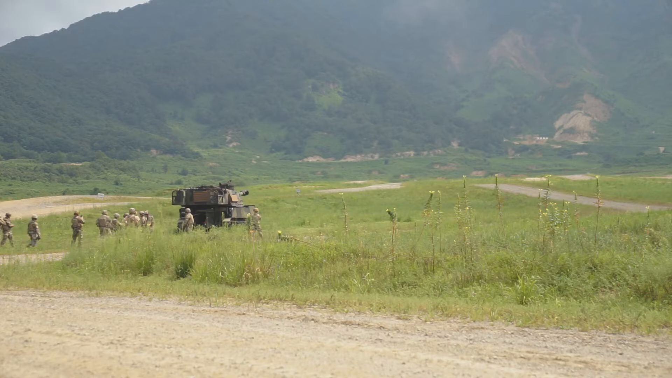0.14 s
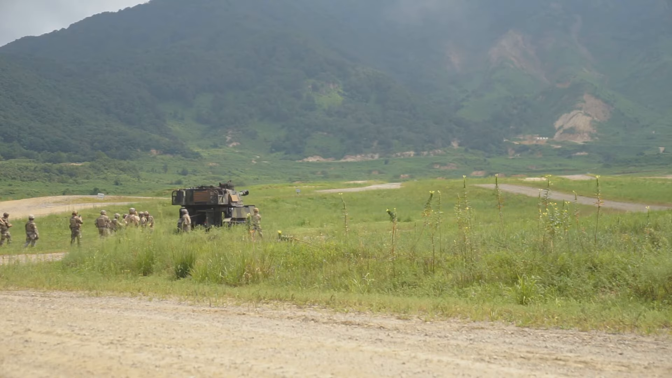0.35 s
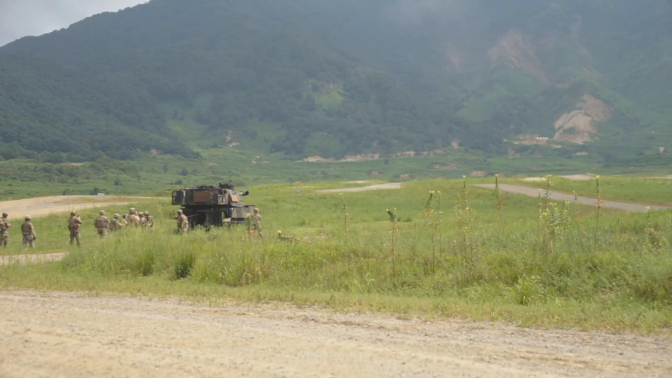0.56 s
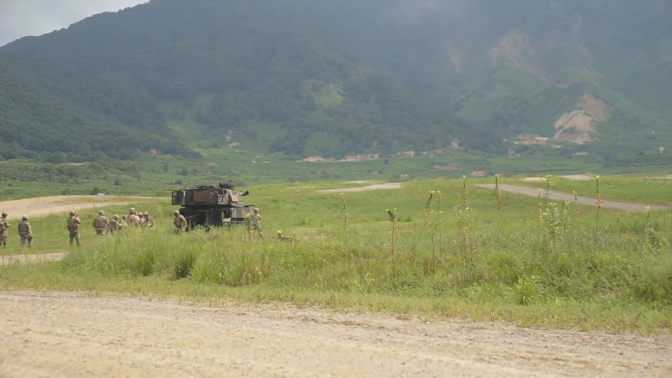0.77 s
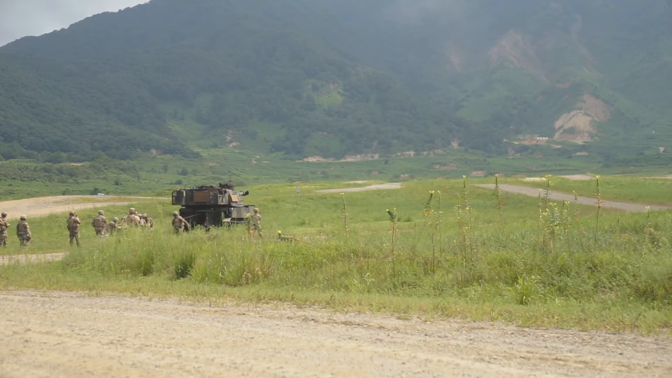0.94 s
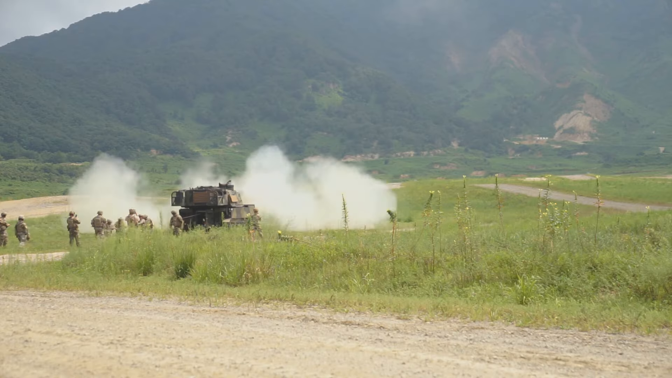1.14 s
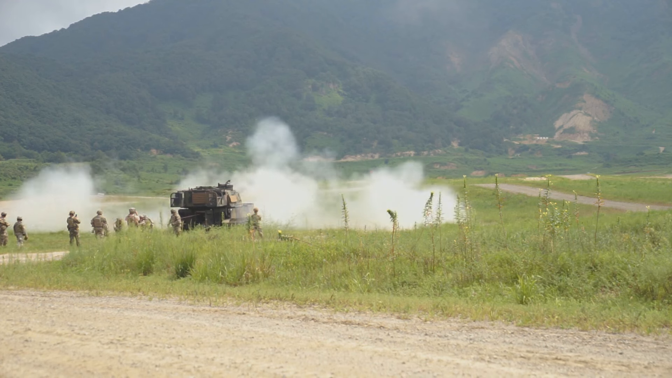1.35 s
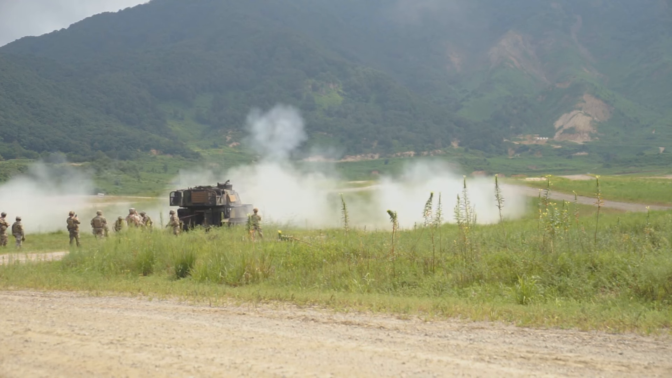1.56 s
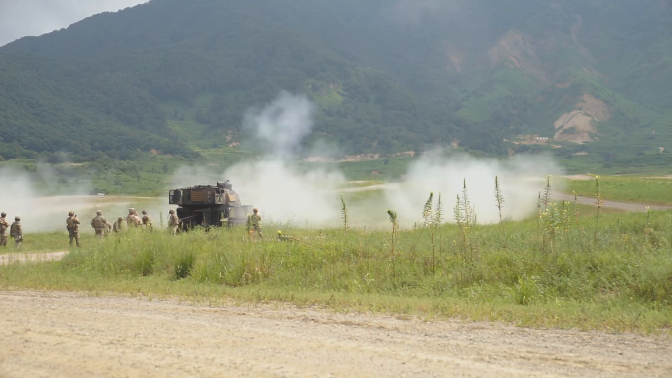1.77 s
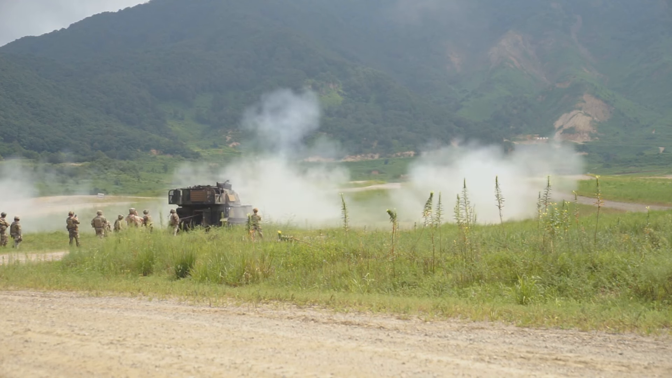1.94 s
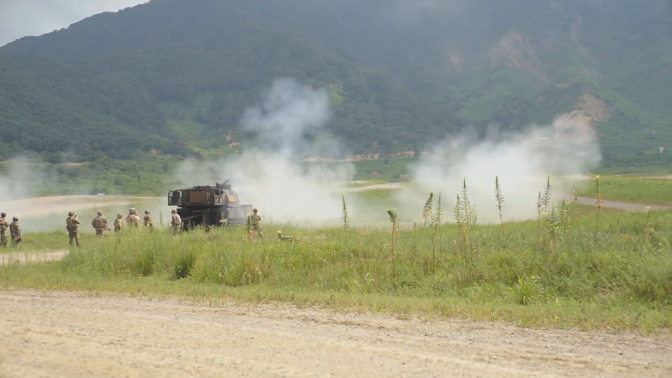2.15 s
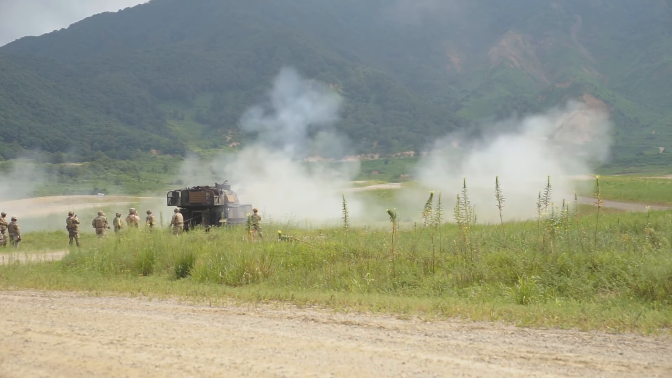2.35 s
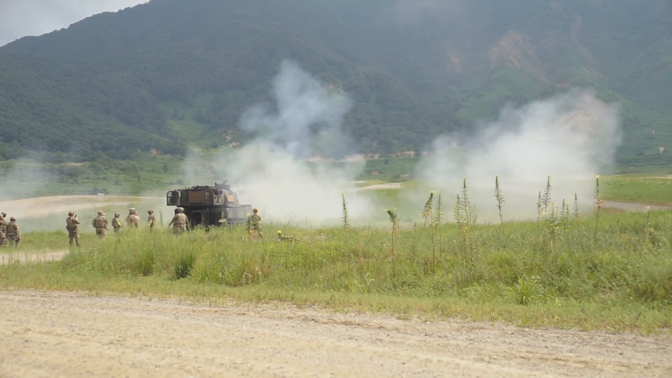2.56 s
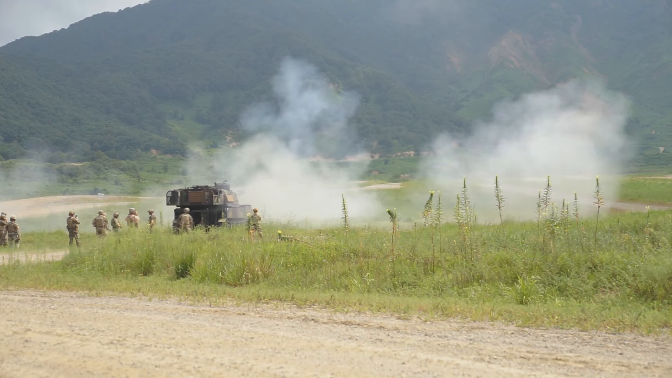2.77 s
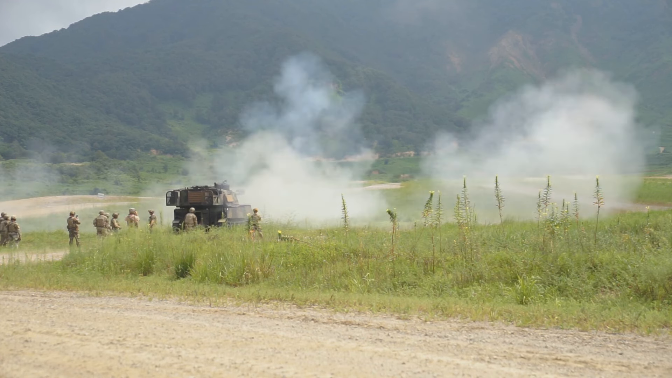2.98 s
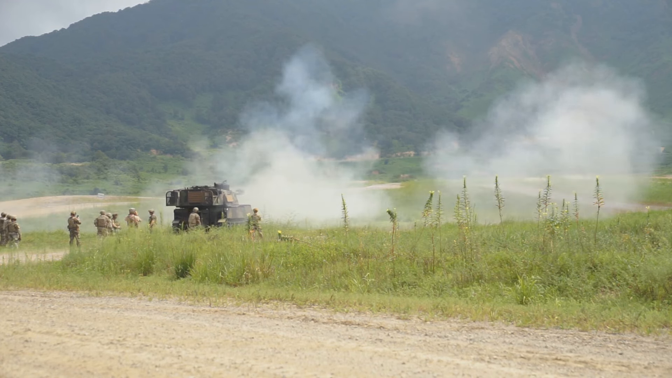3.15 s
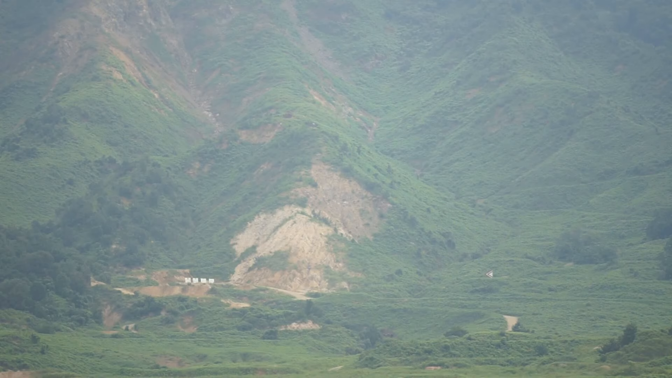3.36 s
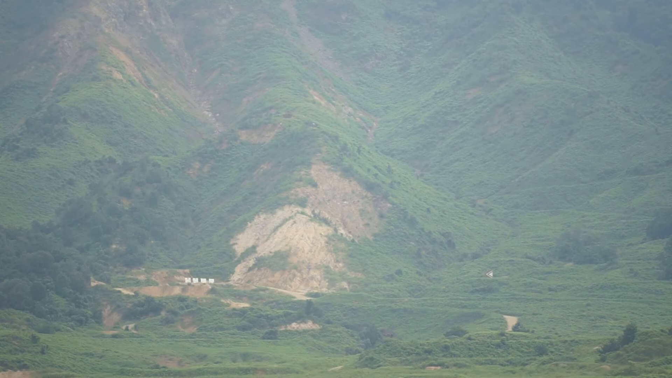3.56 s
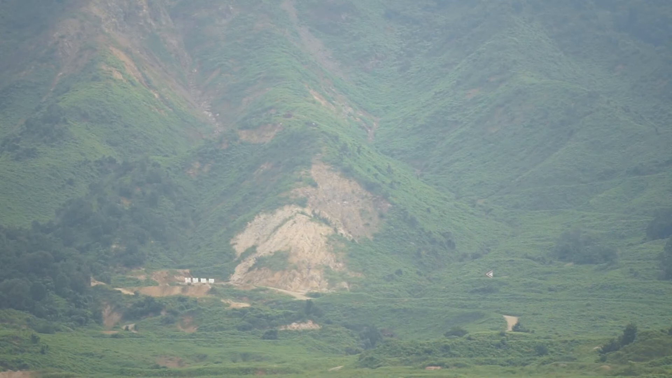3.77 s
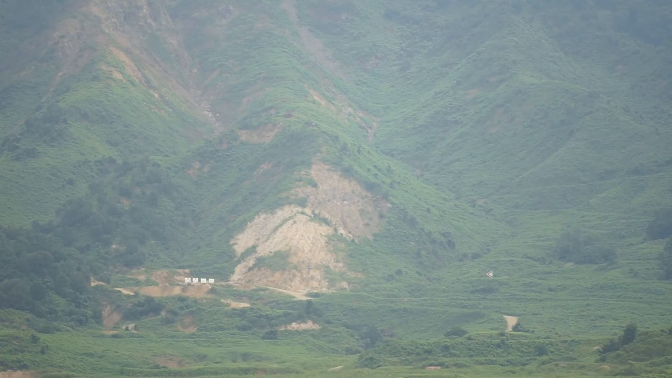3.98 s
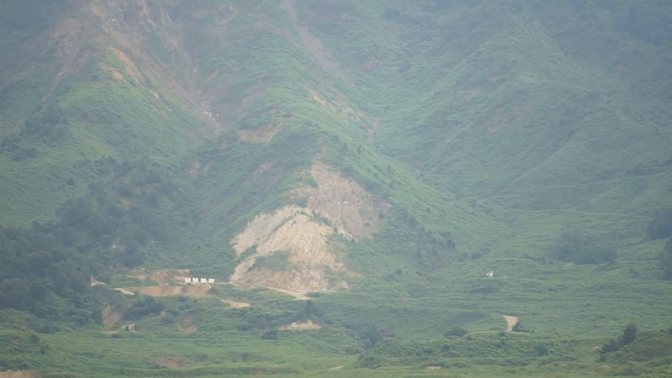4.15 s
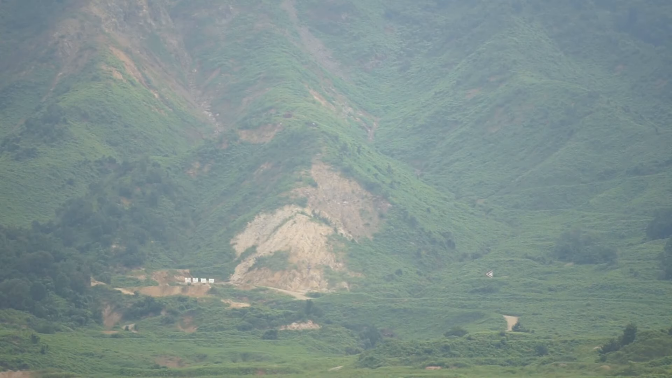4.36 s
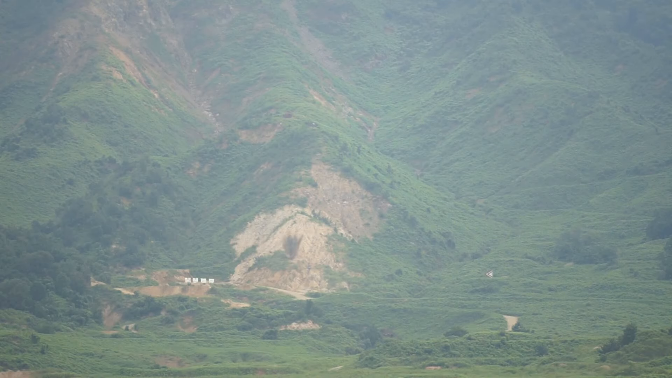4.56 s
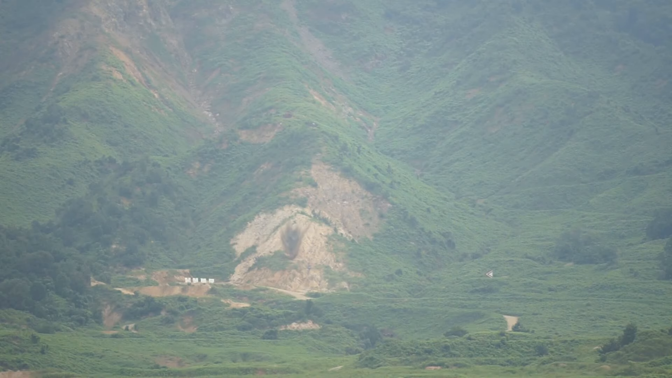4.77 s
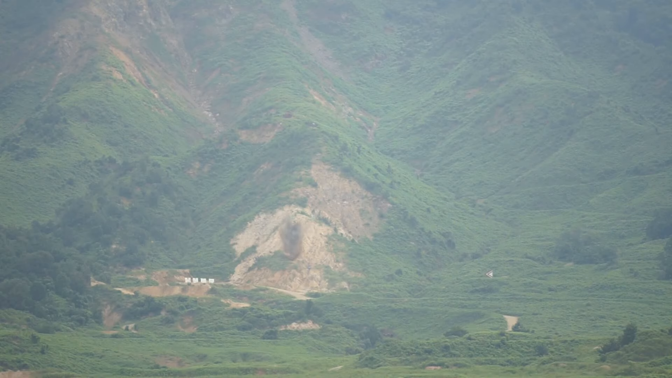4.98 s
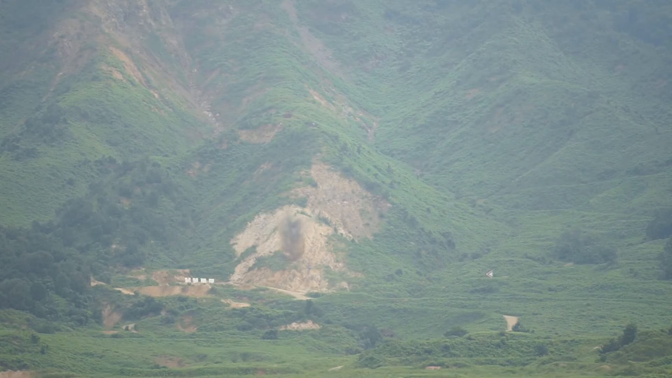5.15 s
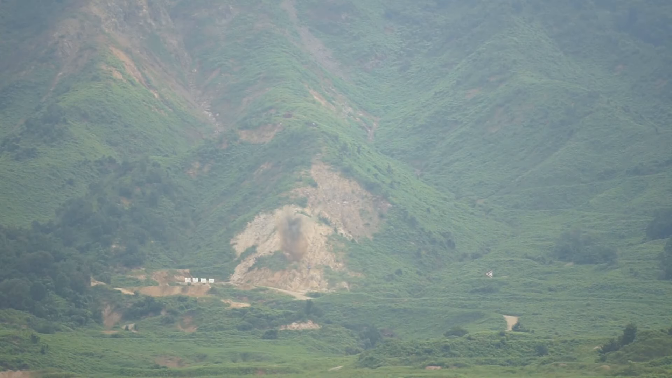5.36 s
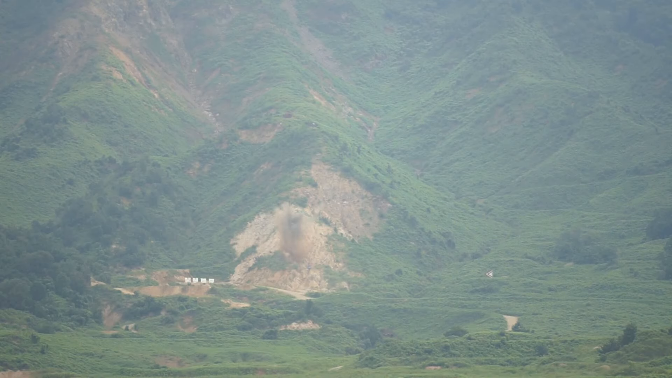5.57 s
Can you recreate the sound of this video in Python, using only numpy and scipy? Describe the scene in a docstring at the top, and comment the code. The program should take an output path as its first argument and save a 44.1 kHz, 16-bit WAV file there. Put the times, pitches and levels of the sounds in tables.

```python
"""A gun blast on an open range: muzzle shocks with turbulent bursts and a deep whump overload a microphone.
Single slopes return hard echoes, built as delayed, lengthened pressure fronts. Grass and ground scatter
the blast as coloured noise, and wooded hills answer with a long roll that dulls as it fades.
Beneath lie the gun's idling engine, sines on one drifting shaft over a noise rush, and faint bird whistles."""
import sys
import numpy as np
from scipy import signal
from scipy.fft import rfft, irfft, next_fast_len
from scipy.io import wavfile
from scipy.ndimage import uniform_filter1d, map_coordinates

SR = 44100
rng = np.random.default_rng(int(sys.argv[2]) if len(sys.argv) > 2 else 0)


def digitize_waveform(pressure):
    """Quantize a signal to 16-bit integers and store it at the path in sys.argv[1].

    Rows of a 2-D input are taken as channels; values are limited to [-1, 1].
    """
    field = np.atleast_2d(pressure).T
    bounded = np.clip(field, -1, 1)
    quanta = np.round(bounded * 32767).astype(np.int16)
    wavfile.write(sys.argv[1], SR, quanta)


N = 247833
T = np.arange(N) / SR  # time in s

# All levels stand ahead of the microphone's overload; colours give relative level only.
# Fronts of the blast: start_s, peak_db, push_s, turbulence_db
MUZZLE_FRONTS = [(1.351, 28, 0.00051, -6), (1.357, 10, 0.00063, 12.5), (1.3604, 17, 0.0093, -3),
                 (1.3676, 8, 0.00048, 4), (1.3734, 4, 0.0034, 16), (1.3851, 16.5, .0024, 0.5),
                 (1.4004, 4, .0013, -11), (1.412, -3, 0.0022, -12)]
# Spectrum of the turbulence: frequency_hz, level_db
TURBULENCE_SPECTRUM = [(100, -2.5), (290, 2), (500, -10), (700, 6), (900, 1.5), (1400, -0.5), (2400, -12),
                       (3600, -8), (6000, -19), (15000, -35.5)]
# Oscillation of the muzzle gas: centre_s, half_length_s, pitch_hz, level_db
GAS_BALL = (1.467, .02, 75, 0)
# Hard echoes, levels ahead of air absorption: start_s, crack_db, thud_db
HARD_ECHOES = [(1.6391, 3, -18), (1.6411, 1, -3), (1.6418, 13, 7.5), (1.98, 4, -8), (1.984, -1, -6),
               (1.989, 1.5, -13), (2.0255, 1, -14), (2.0482, -4, -30), (2.158, -5, -5),
               (2.8051, -12.5, -17)]
# Broad slopes, each returning one swell, levels ahead of each layer's gain: start_s, low_roll_db, scatter_db
BROAD_SLOPES = [(1.706, -20, -23.5), (1.96, -20.5, -37.5), (2.18, -23, -36), (2.32, -32.5, -27.5),
                (2.85, -43, -37.5)]
# Spectrum of the low roll: frequency_hz, level_db
BOOM_SPECTRUM = [(12, -4), (25, -1.5), (45, 3.5), (68, 1), (110, -2), (160, -4), (240, -13), (350, -34.5),
                 (800, -70.5)]
# Spectrum scattered by grass and ground: frequency_hz, level_db
FIELD_SPECTRUM = [(150, -21), (250, 5.5), (359, -7), (392, 0), (516, -12.5), (945, -7), (1120, -11),
                  (1290, -12), (1700, -11), (1920, -14.5), (3110, -12), (5790, -18.5), (8920, -26.5),
                  (12400, -32.5), (15500, -41)]
# Spectrum scattered by the wooded hills: frequency_hz, level_db
HILL_SPECTRUM = [(150, -14), (250, -7.5), (352, -3), (404, -3), (531, -4.5), (664, -1.5), (1820, -8.5),
                 (3500, -10.5), (4840, -18), (5750, -20), (6710, -26), (7820, -29.5), (9280, -34),
                 (13800, -45.5), (15000, -66.5)]
# Firing orders and gear whine: frequency_hz, rms_level_db
ENGINE_LINES = [(75.4, -66), (96.9, -45.5), (172.3, -54), (592.2, -71), (672.9, -58.5), (845.2, -61.5),
                (888.2, -72.5), (952.8, -75), (985.1, -65), (1082, -62), (1270, -68.5), (1588, -71.5),
                (1685, -62.5), (3370, -72.5), (4043, -80)]
# Spectrum of the fans' rush: frequency_hz, level_db
RUSH_SPECTRUM = [(12, -57.5), (20, -10.5), (92, -2.5), (178, -5), (398, -20.5), (571, -18), (674, -20),
                 (733, -16.5), (1080, -20), (1510, -25), (1680, -26), (1830, -27), (3460, -34.5),
                 (12400, -67), (15000, -84)]
# Bird whistles: centre_s, length_s, pitch_hz, glide_hz, level_db
BIRD_WHISTLES = [(0.167, 0.17, 3200, -63, -71), (.19, .16, 2640, -62, -66), (4.762, 0.042, 4060, 65, -69),
                 (5.355, 0.06, 3640, 400, -63)]
# Ripples of the microphone's housing: frequency_hz, level_db
HOUSING_RIPPLES = [(2600, 0), (3600, 2), (4800, -1.5), (5800, 3.5), (6900, -1), (8000, 3), (9200, -3.5),
                   (11000, 0.5)]
# Channel imbalance: frequency_hz, left_minus_right_db
CHANNEL_LEAN = [(100, 1.5), (1000, 1.46), (3500, 0.25), (8000, 0)]

SUCTION_S = .008  # divided by the push length it gives the suction's gain: the sharper, the deeper
TURBULENCE_T60_S, TURBULENCE_SPREAD = 0.016, 2.1  # at the first front; seconds more per second of detour
# An echo's crack after one second of detour, and the time constant of every thud
CRACK_S, CRACK_RISE_S, CRACK_SUCTION, THUD_S = .0005, 0.000204, 1.4, .0016
ECHO_TOP_HZ = 5060  # the air takes the treble above this
SLOPE_RISE, SLOPE_FALL = 0.73, 0.77  # seconds per 60 dB for each second of detour
GRASS_UNTIL_S = 1.8  # slopes that answer sooner are grassy, later ones wooded
NEAR_S, NEAR_RISE_S = 1.4025, .05  # the ground around the gun answers
HILLS_S, HILLS_RISE_S, HILLS_HOLD_S = 1.974, 0.21, 0.26  # the hills answer, from their foot to their crest
TOP_HZ = 15150  # upper band edge of the output


def blast():
    """Shock waves: muzzle fronts and first bounces each trail turbulence; later bursts last longer."""
    waves, bursts = np.zeros(N), np.zeros(N)
    for start, peak_db, push, turbulence_db in MUZZLE_FRONTS:
        waves += amp(peak_db) * front(start, push, SUCTION_S / push, rise=.00003)
        t60 = TURBULENCE_T60_S + TURBULENCE_SPREAD * detour(start)
        bursts += (T > start) * amp(turbulence_db - 60 * np.abs(T - start) / t60)
    return waves + bursts * scatter(TURBULENCE_SPECTRUM, rate=1200, distinct_db=-3.5)


def whump():
    """Gas oscillation: the ball of muzzle gas collapses and swings back for a few deep cycles."""
    centre, half_length, hz, db = GAS_BALL
    envelope = np.exp(-((T - centre) / half_length) ** 2)
    return amp(db) * envelope * -np.cos(2 * np.pi * hz * (T - centre))


def echoes():
    """Specular reflection: single faces return a crack that lengthens with distance, then a thud of suction."""
    sound = np.zeros(N)
    for start, crack_db, thud_db in HARD_ECHOES:
        stretch = np.sqrt(detour(start))
        crack = front(start, stretch * CRACK_S, CRACK_SUCTION, stretch * CRACK_RISE_S)
        u = np.clip((T - start - 2 * stretch * CRACK_S) / THUD_S, 0, 60)
        thud = -u * (2 - u) * np.exp(-u)  # suction first, then a rebound
        sound += amp(crack_db) * crack + amp(thud_db) * thud
    return filtered(sound, lambda hz: 1 / (1 + 1j * hz / ECHO_TOP_HZ))


def boom(gain_db=3):
    """Superposition: the suction phases of many reflections merge into an unbroken low roll."""
    roll = coloured(rng.standard_normal(N), BOOM_SPECTRUM)
    local_power = np.abs(uniform_filter1d(roll ** 2, size=2200))
    roll /= np.sqrt(local_power + 1e-6)  # evens out the noise's own swells
    near = swell(NEAR_S, db=-7, rise=NEAR_RISE_S, hold=0, t60=0.69)
    far = swell(HILLS_S, db=-31, rise=1.8, hold=HILLS_HOLD_S, t60=4.27)
    slopes = [slope(start, roll_db) for start, roll_db, _ in BROAD_SLOPES]
    return amp(gain_db) * together([near, far] + slopes) * roll


def field():
    """Diffuse scattering: grass and ground hiss back the shock's treble, a quick fall, then a faint tail."""
    near = swell(NEAR_S, db=-13, rise=NEAR_RISE_S, hold=.03, t60=0.46)
    tail = swell(NEAR_S, db=-26.5, rise=NEAR_RISE_S, hold=0, t60=2.96)
    grassy = [slope(start, db) for start, _, db in BROAD_SLOPES if start < GRASS_UNTIL_S]
    return together([near, tail] + grassy) * scatter(FIELD_SPECTRUM, rate=2100, distinct_db=-4)


def hills(gain_db=0.54, dulling_db=3.0, pivot_hz=900, midway_s=1.89, limit_hz=4000, patchy_db=1.64, surge_db=0.47):
    """Absorption along the path: echoes through more air and forest tilt darker, then hold that tilt."""
    hz, t, spectrum = signal.stft(scatter(HILL_SPECTRUM, rate=270, distinct_db=-13.5), SR, nperseg=512)
    octaves = np.log2(np.clip(hz, 250, limit_hz) / pivot_hz)[:, None]
    tilt_db = -dulling_db * octaves * np.clip(t - midway_s, -.4, 1.2)  # dulling_db is per octave per second
    patches = uniform_filter1d(rng.standard_normal(spectrum.shape), size=5, axis=0)  # across frequency
    patches = unit(uniform_filter1d(patches, size=10, axis=1))  # across time
    roll = signal.istft(spectrum * amp(tilt_db + patchy_db * patches), nperseg=512)[1][:N]
    surges_db = surge_db * wobble(45)  # ridge after ridge answers
    forest = swell(HILLS_S, db=-28.0, rise=HILLS_RISE_S, hold=HILLS_HOLD_S, t60=4.58)
    wooded = [slope(start, db) for start, _, db in BROAD_SLOPES if start >= GRASS_UNTIL_S]
    return amp(gain_db + surges_db) * together([forest] + wooded) * roll


def engine(drift=0.00103, flutter_db=1.34, rush_db=-45.5):
    """Rotating machinery: the idling diesel's orders and gear whine share one shaft, over the rush of its fans."""
    turns = T + drift * np.cumsum(wobble(2.6)) / SR  # shaft time, drifting slightly
    lines = np.zeros(N)
    for hz, db in ENGINE_LINES:
        tone = np.sqrt(2) * np.sin(2 * np.pi * (hz * turns + rng.random()))
        lines += amp(db + flutter_db * wobble(4.8)) * tone
    rush = coloured(rng.standard_normal(N), RUSH_SPECTRUM)
    return lines + amp(rush_db + .5 * wobble(4)) * rush


def birds():
    """Frequency glide: short whistles, blurred in level on their way across the field."""
    song = np.zeros(N)
    for centre, length, hz, glide, db in BIRD_WHISTLES:
        u = np.clip((T - centre) / length, -.5, .5)
        envelope = np.cos(np.pi * u) ** 2
        phase = 2 * np.pi * np.cumsum(hz + glide * u) / SR
        song += amp(db) * envelope * np.sqrt(2) * np.sin(phase)
    return song * wobble(180)


def front(start, push, suction, rise):
    """Blast wave: a jump in pressure that falls through zero into a longer suction."""
    t = np.maximum(T - start, 0)
    u = np.minimum(t / push, 60)
    wave = (1 - u) * np.exp(-u) * (1 - np.exp(-t / rise))
    return np.where(wave < 0, suction * wave, wave)


def scatter(colour, rate, distinct_db):
    """Diffuse reflection: countless tiny returns, with rate stronger ones a second standing out."""
    distinct = rng.standard_normal(N) * (rng.random(N) < rate / SR)
    return coloured(rng.standard_normal(N) + amp(distinct_db) * unit(distinct), colour)


def slope(start, db):
    """Spread of path lengths: the farther a slope, the more its swell is drawn out."""
    return swell(start, db, SLOPE_RISE * detour(start), 0, SLOPE_FALL * detour(start))


def swell(start, db, rise, hold, t60):
    """Exponential growth and decay: climbs 60 dB in rise seconds up to start, holds, falls 60 dB in t60."""
    climb = np.maximum(start - T, 0) / rise
    decay = np.maximum(T - start - hold, 0) / t60
    return amp(db - 60 * (climb + decay))


def detour(start):
    """Propagation delay: seconds by which an arrival trails the first front."""
    return max(start - MUZZLE_FRONTS[0][0], 0)


def together(gains):
    """Incoherent addition: unrelated reflections add in power."""
    return np.sqrt(np.sum(np.square(gains), axis=0))


def coloured(x, colour):
    """Spectral shaping: x with a spectrum, heard through the housing, at rms 1."""
    return unit(filtered(x, lambda hz: amp(along(colour, hz) + along(HOUSING_RIPPLES, hz))))


def filtered(x, response):
    """Linear filtering: the spectrum of x times a response of frequency."""
    m = next_fast_len(N + SR // 2)
    hz = np.fft.rfftfreq(m, 1 / SR)
    return irfft(rfft(x, m) * response(hz), m)[..., :N]


def along(points, hz):
    """Logarithmic frequency scale: (Hz, value) points joined on a log axis."""
    f, v = np.transpose(points)
    return np.interp(np.log(hz + 1), np.log(f + 1), v)


def wobble(rate):
    """Slow random modulation: a smooth curve through rate random knots a second."""
    return map_coordinates(rng.standard_normal(int(N * rate / SR) + 4), [T * rate])


def unit(x):
    """Root mean square: x scaled to rms 1."""
    return x / np.sqrt(np.mean(x ** 2) + 1e-20)


def amp(db):
    """Decibel scale: amplitude gain of a level in dB."""
    return 10 ** (np.asarray(db) / 20)


def scene():
    """Superposition at a distance: everything lies far ahead, so both channels hear the same."""
    gun = blast() + whump()
    answers = echoes() + boom() + field() + hills()
    ahead = gun + answers + engine() + birds()
    return np.array([ahead, ahead])


def record(dry, rail=0.84, coupling_hz=52, give=.02):
    """Overload: the microphone saturates, its coupling capacitor lets held pressure sag, the converter clips."""
    held = dry / (1 + np.abs(dry / rail) ** 8) ** (1 / 8)
    held = held + give * np.clip(dry, -8, 8)  # even at its rail the diaphragm yields a little
    sagged = filtered(held, lambda hz: 1j * hz / (coupling_hz + 1j * hz))
    # the left channel is slightly louder in the bass and mids; the treble is level on both sides
    leaning = filtered(sagged, lambda hz: amp(np.outer([.5, -.5], along(CHANNEL_LEAN, hz))))
    band_limit = signal.ellip(10, .1, 70, TOP_HZ, fs=SR, output="sos")
    return signal.sosfilt(band_limit, np.clip(leaning, -1, 1))


dry = scene()
out = record(dry)
digitize_waveform(out)
```